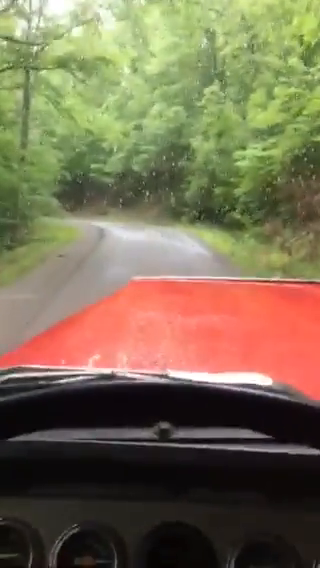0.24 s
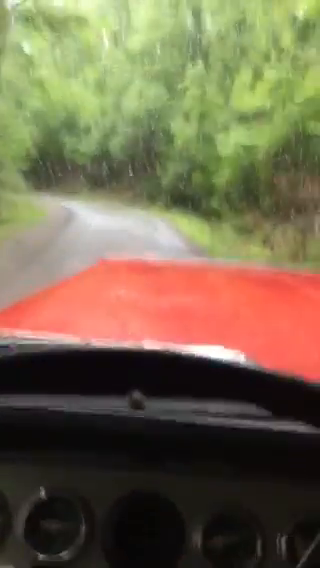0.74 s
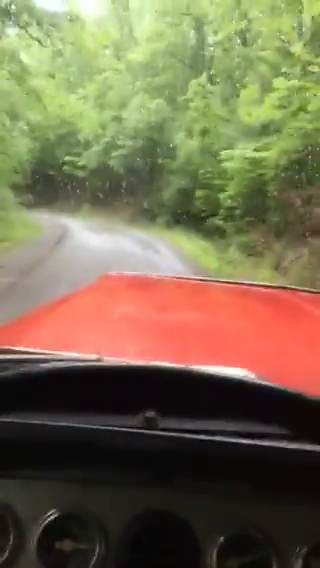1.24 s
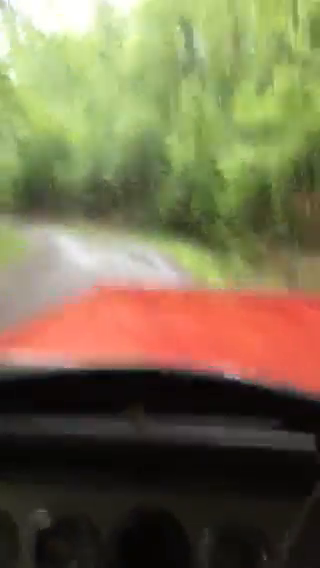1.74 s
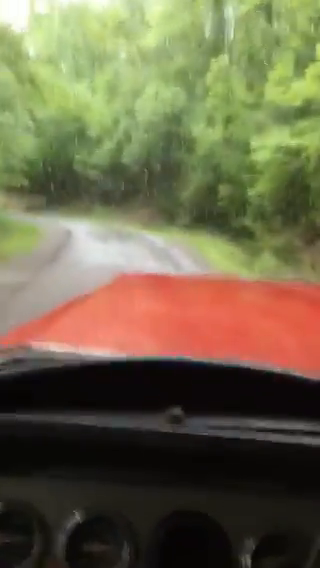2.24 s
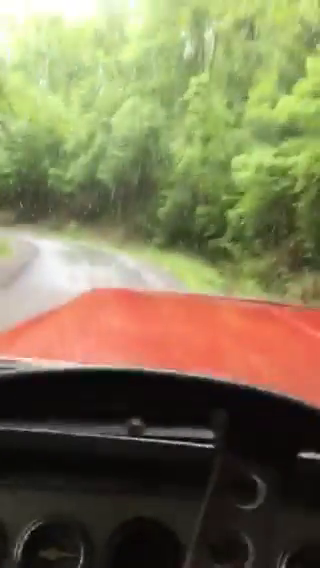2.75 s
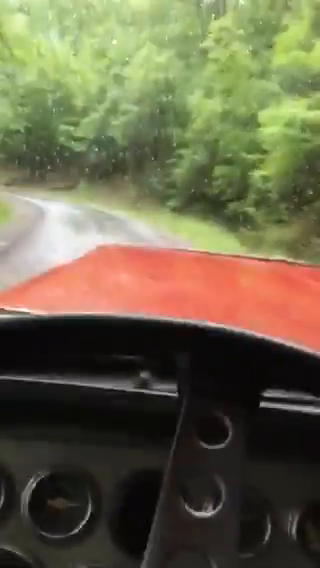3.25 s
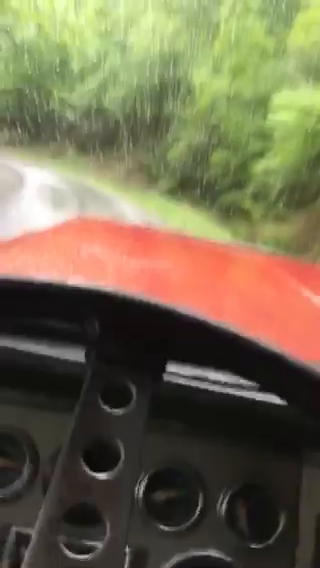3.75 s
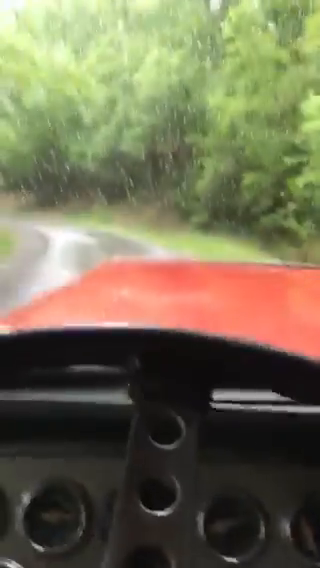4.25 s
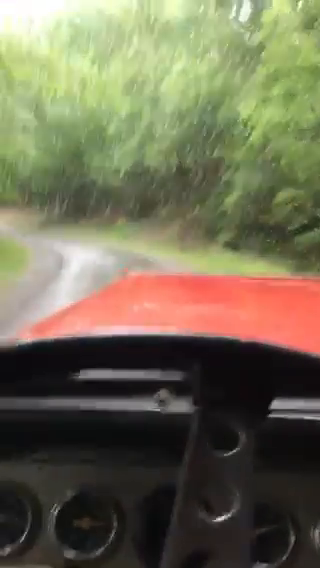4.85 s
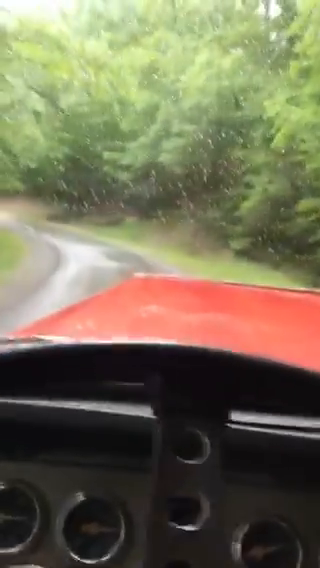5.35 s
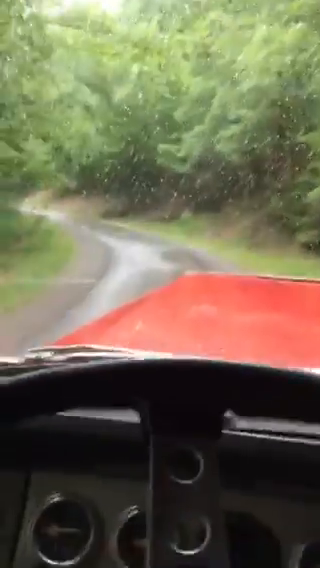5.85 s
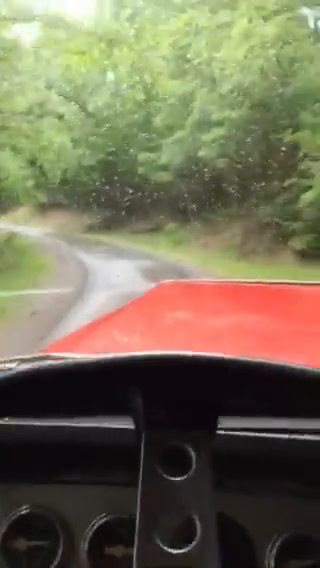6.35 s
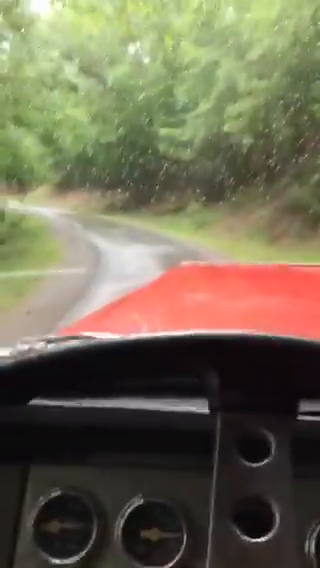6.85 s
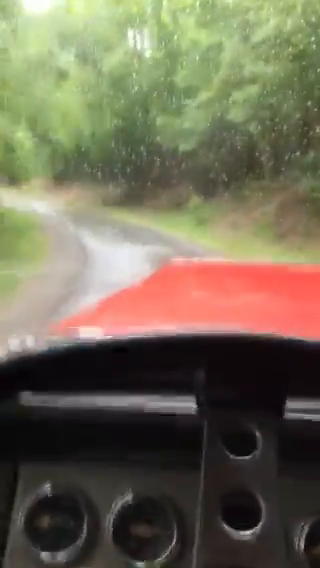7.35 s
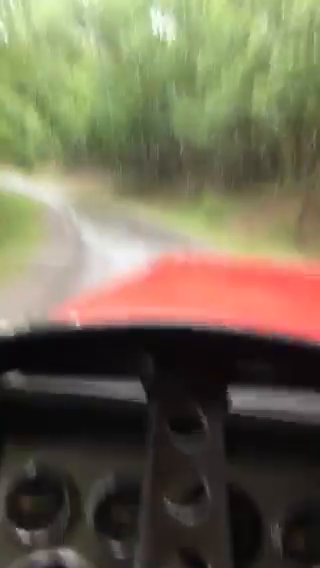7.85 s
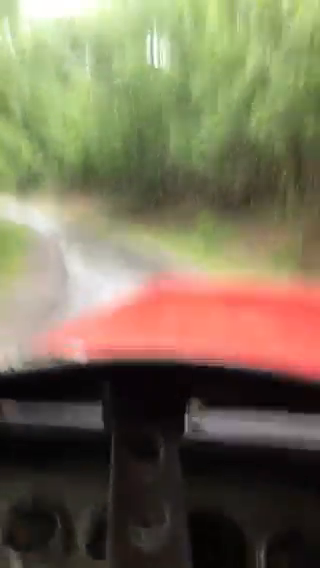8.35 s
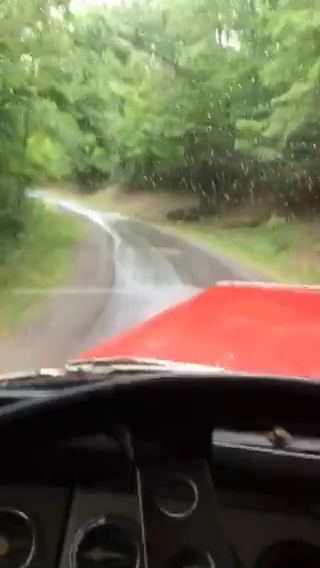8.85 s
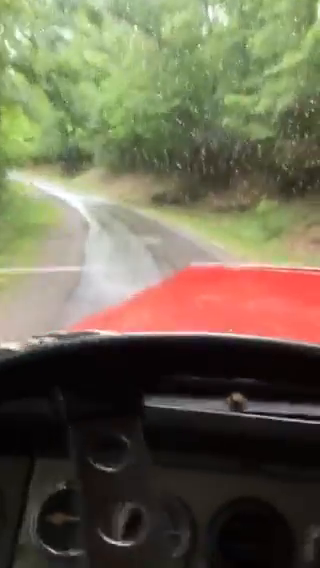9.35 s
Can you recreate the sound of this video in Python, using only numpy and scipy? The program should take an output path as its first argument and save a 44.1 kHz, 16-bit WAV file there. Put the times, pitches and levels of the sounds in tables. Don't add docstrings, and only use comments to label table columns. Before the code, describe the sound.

One close microphone in a small, closed cab catches a heavy, booming engine hum with a rough low rumble from the floor. Tonal gear whine and a very faint breathy turbo whistle ride above. A soft jolt opens it, followed by scattered metallic ticks, dash squeaks and short bracket rings. The middle is smoother, the engine sagging slightly, then pulling a little harder toward the end.

```python
import sys
import numpy as np
from scipy import signal
from scipy.fft import rfft, irfft
from scipy.io import wavfile
from scipy.ndimage import uniform_filter1d

SR = 44100
rng = np.random.default_rng(int(sys.argv[2]) if len(sys.argv) > 2 else 0)


def to_wav(sig):
    pcm = np.clip(np.atleast_2d(sig), -1, 1) * 32767
    pcm = np.round(pcm).astype(np.int16)
    wavfile.write(sys.argv[1], SR, pcm.T)


def natural_amplitude(level_db):
    exponent = np.asarray(level_db, float) / 20
    return 10 ** exponent


N = 423360
TIME = np.arange(N) / SR


def curves(table):
    s, *columns = np.transpose(table)
    return [np.interp(TIME, s, column) for column in columns]


def unit(x):
    return x / np.sqrt(np.mean(np.abs(x) ** 2))


def gain(db):
    return np.exp(db * np.log(10) / 20)


def walk(rate_hz):
    fine = 16
    count = int(N / SR * rate_hz) + 2
    held = np.repeat(rng.standard_normal(count), fine)
    slewed = uniform_filter1d(uniform_filter1d(held, size=fine), size=fine)
    return np.interp(TIME * rate_hz * fine, np.arange(len(slewed)), unit(slewed))


def humps(events):
    return sum(db * np.exp(-((TIME - s) / half_s) ** 2) for s, db, half_s in events)


def band(hz, width_hz):
    b, a = signal.iirpeak(hz, hz / width_hz, fs=SR)
    once = signal.lfilter(b, a, rng.standard_normal(N))
    return unit(signal.lfilter(b, a, once))


def line(turns, db, rough, rate):
    phase = (2 * np.pi * (turns - np.floor(turns) + rng.random())).astype(np.float32)
    in_phase = (1 + rough * walk(rate)) * np.cos(phase)
    quadrature = rough * walk(rate) * np.sin(phase)
    return np.sqrt(2) * gain(db) * (in_phase - quadrature)


def coloured(spectrum, level_db, flicker_db, rate):
    hz, db = np.transpose(spectrum)
    f = np.maximum(np.fft.rfftfreq(N, 1 / SR), 1)
    colour = natural_amplitude(np.interp(np.log(f), np.log(hz), db, -200, -200)) * np.sqrt(SR / 2)
    noise = rfft(rng.standard_normal(N)) * colour
    place = 2 * np.log2(f)
    total = 0
    for centre in np.arange(np.floor(2 * np.log2(hz[0])), 2 * np.log2(hz[-1]) + 1):
        part = irfft(noise * np.clip(1 - abs(place - centre), 0, 1), N)
        total = total + part * gain(flicker_db * walk(rate))
    return natural_amplitude(level_db - np.mean(level_db)) * total


def swell(hz, modes):
    lift_db = 4
    slow_hz, boost = hz[::256], curves(TURBO_SPEED)[0]
    gain_db = sum(db / (1 + (2 * (slow_hz - centre) / width) ** 2) for centre, width, db in modes)
    return np.interp(TIME, TIME[::256], gain_db) - lift_db * 10 * (1 - boost / boost.max())


# [multiple of the cycle, level/dB]
CYCLE_LINES = [(2, -49), (3, -39.5), (4, -38.5), (5, -42.5), (8, -50.5), (10, -43.5), (13, -52), (14, -52),
               (16, -61), (18, -53), (20, -64), (21, -69.5), (22, -56.5), (23, -65.5), (24, -63.5),
               (26, -68), (27, -62.5), (29, -61.5), (30, -60.5), (34, -59.5), (37, -62.5), (38, -64.5),
               (40, -64.5), (44, -62.5), (50, -66)]
SHAFT_RATIOS = (2, 14 / 3, 9.11, 9.516, 16)
SHAFT_DB = (-53, -59, -63.5, -60.5, -70.5)
# [f/Hz, width/Hz, gain/dB]
BULKHEAD = [(177.6, 2, 5), (179.6, 6, 12), (188.26, 3.5, 16.5), (422, 33, 9), (813, 8, 5), (836, 12, 10),
            (849, 9.3, 10.5), (1462, 30, 9.5)]


def engine(firings, firing_hz, boom_db):
    sway_db, timing_rise_db_per_s = 0.13, 1.5
    boom = line(firings, boom_db + sway_db * walk(5), rough=0.022, rate=33)
    uneven = sum(line(firings * k / 6, db, rough=0.082, rate=4) for k, db in CYCLE_LINES)
    levels = [db + swell(k * firing_hz, BULKHEAD) + walk(3) for k, db in zip(SHAFT_RATIOS, SHAFT_DB)]
    levels[-1] = levels[-1] + timing_rise_db_per_s * (TIME - TIME.mean())
    shafts = sum(line(firings * k, db, rough=0.03 * k, rate=20) for k, db in zip(SHAFT_RATIOS, levels))
    return boom + uneven + shafts


MESH_DB = (-56, -55.5, -59, -61.5)
# [multiple of the mesh, level/dB]
MESH_UPPER = [(5, -65.5), (7, -65.5), (9, -72)]
# [f/Hz, width/Hz, gain/dB]
HOUSING = [(220.5, 7, 9), (238, 4.1, 5), (249.2, 8, 16), (440, 12, 7.5), (481, 14, 5.5), (499.1, 22, 13.5),
           (669, 24, 10.5), (714, 19, 12), (747, 12, 12), (893, 31, 10), (955, 14, 7)]


def gear(hunting_hz, firing_hz):
    slip_ratio, lock_ratio = 2.416, 8 / 3
    grips_s, locks_s = 0.5, 3.6
    grip = np.clip((TIME - grips_s) / (locks_s - grips_s), 0, 1)
    ratio = slip_ratio + (lock_ratio - slip_ratio) * grip ** 2 * (3 - 2 * grip)
    mesh = np.cumsum(ratio * hunting_hz) / SR
    whine = 0
    for k, db in enumerate(MESH_DB, 1):
        level = db + swell(k * ratio * firing_hz, HOUSING) + 0.86 * walk(2.5)
        whine = whine + line(mesh * k, level, rough=0.08 * k, rate=22)
    slip_loss_db = 25 * (lock_ratio - ratio)
    for k, db in MESH_UPPER:
        whine = whine + line(mesh * k, db + 1.3 * walk(1.5) - slip_loss_db, rough=0.6, rate=35)
    return whine


# [t/s, shaft f/Hz]
TURBO_SPEED = [(0, 4490), (1.2, 4450), (2.4, 4420), (3.4, 4340), (4.2, 4370), (4.9, 4330), (6, 4420),
               (7.3, 4480), (7.8, 4420), (8.2, 4270), (8.7, 4030), (9, 4000), (9.6, 4080)]
# [multiple of the shaft, width/Hz, level/dB, loss/dB as the shaft slows by a tenth]
TURBO_PARTIALS = [(1, 200, -81, 3), (2, 380, -76, 7), (3, 600, -76.5, 2)]


def turbo():
    shaft_hz = curves(TURBO_SPEED)[0]
    turns = np.cumsum(shaft_hz) / SR
    slowing = 10 * (1 - shaft_hz / shaft_hz.max())
    flutter = natural_amplitude(1.3 * walk(20))
    air = 0
    for k, width_hz, db, loss_db in TURBO_PARTIALS:
        breath = walk(width_hz) + 1j * walk(width_hz)
        air = air + np.real(breath * np.exp(2j * np.pi * k * turns)) * natural_amplitude(db - loss_db * slowing)
    return flutter * air


def bursts(events, noise, rise_s, fall_s):
    t = np.arange(int(0.1 * SR)) / SR
    kicks = np.zeros(N)
    for s, db in events:
        kicks[int(s * SR)] = natural_amplitude(db)
    shape = (1 - np.exp(-t / rise_s)) * np.exp(-t / fall_s)
    return signal.fftconvolve(kicks, shape / shape.max())[:N] * noise


# [t/s, peak level/dB]
SQUEAKS = [(1.257, -54), (1.4717, -51.5), (1.9126, -58), (2.612, -55.5), (2.9622, -54), (3.2133, -55.5),
           (7.2537, -56), (7.3377, -54), (7.5146, -52)]
# [t/s, peak level/dB]
TICKS = [(0.446, -47.5), (0.8603, -53), (1.365, -53.5), (1.475, -47.5), (1.7582, -51.5), (1.93, -47),
         (2.6092, -58.5), (2.9706, -50.5), (3.1473, -55.5), (3.2126, -51.5), (7.7933, -51.5)]


def trim():
    squeak = unit(line(5700 * TIME, 0, rough=0.9, rate=1500))
    bright = unit(band(13500, 1500) + band(14000, 6000))
    squeaks = natural_amplitude(-6) * bursts(SQUEAKS, squeak, rise_s=0.003, fall_s=0.012)
    ticks = natural_amplitude(-8.5) * bursts(TICKS, bright, rise_s=0.0008, fall_s=0.013)
    return squeaks + ticks


def spells(table, hz, rough):
    gates = 0
    for s, length_s, db in table:
        inside_s = np.minimum(TIME - s, s + length_s - TIME)
        gates = gates + np.clip(inside_s / 0.0087, 0, 1) * natural_amplitude(db)
    return gates * line(hz * TIME, 0, rough, rate=40)


# [start t/s, length t/s, level/dB]
BRACKET_RINGS = [(.24, 0.13, -53), (0.464, 0.071, -50), (0.559, 0.065, -54), (.63, 0.056, -50),
                 (.7, .05, -55), (1.069, 0.28, -49.5), (1.331, .07, -50), (1.64, .07, -50),
                 (1.751, .1, -53)]


def bracket():
    return spells(BRACKET_RINGS, 1462, rough=0.1)


# [start t/s, length t/s, level/dB]
DRAUGHTS = [(3.9, 0.48, -72.5), (4.5, 0.56, -73.5), (5.1, .55, -72)]


def door_seal():
    return spells(DRAUGHTS, 3250, rough=0.6)


# [t/s, effort level/dB]
LOAD = [(0, 0.5), (.5, 0), (1.6, .5), (2.4, -2), (3.2, -1), (3.6, -1), (4.8, -1.5), (5.6, -0.5), (7, 0),
        (7.6, 2), (8, .5), (8.4, 1.1), (9.6, -0.5)]


def effort_db():
    return curves(LOAD)[0]


# [f/Hz, level/dB per Hz]
JOIN = (400, -80)
# [f/Hz, level/dB per Hz]
BLOCK = [JOIN, (450, -76), (520, -73.0), (620, -78.0), (680, -74), (800, -74.0), (950, -75.5),
         (1100, -80.5), (1400, -79.0), (1700, -81.5), (2000, -82.5), (2600, -86.5), (2900, -92.5),
         (3300, -95.5)]
# [f/Hz, width/Hz, level/dB]
PANELS = [(489.4, 21, -56.5), (820, 110, -68.5), (970.4, 46, -59), (1305, 50, -61.5), (1459, 59, -59.5),
          (1699, 68, -62), (2045, 66, -65.5), (2498, 70, -72), (3260, 120, -72)]


def block():
    load_db = effort_db()
    panels = sum(band(hz, width) * natural_amplitude(db + walk(2.8)) for hz, width, db in PANELS)
    clatter = coloured(BLOCK, load_db, flicker_db=0.5, rate=12)
    return clatter + panels * natural_amplitude(load_db - np.mean(load_db))


# [f/Hz, level/dB per Hz]
ROAD = [(22, -81.5), (28, -63.5), (34, -61.0), (50, -56.5), (75, -57.0), (110, -54.0), (140, -57.0),
        (168, -60), (195, -61), (230, -68), (260, -73.0), (300, -76.0), (350, -80.0), JOIN]


def road():
    bump_db, bump_s = 8, 0.15
    level_db = 0.4 * effort_db() + bump_db * np.exp(-TIME / bump_s)
    return coloured(ROAD, level_db, flicker_db=1.3, rate=18)


# [f/Hz, level/dB per Hz]
SPRAY = [(2900, -94.5), (3500, -92.5), (4000, -97.5), (4550, -99), (4850, -105), (5600, -102), (6700, -104),
         (7700, -108.5), (8800, -107.5), (9800, -108.5), (10400, -112), (11300, -109.5), (13500, -109),
         (15800, -110.5)]
# [t/s, extra level/dB, half-length t/s]
PUDDLES = [
    (.5, 2, .25),
    (3.15, 2, .1),
]


def spray():
    return coloured(SPRAY, effort_db() + humps(PUDDLES), flicker_db=0.6, rate=22)


# [t/s, firing f/Hz]
FIRING = [(0, 91.6), (.4, 91.9), (1.2, 91.5), (1.5, 90.8), (2.7, 90.55), (3.5, 89.3), (3.8, 89.55),
          (4.2, 88.8), (4.5, 89.3), (5.4, 89.45), (5.9, 90.45), (6.25, 90.6), (7.0, 92.2), (7.5, 93.7),
          (8.4, 93.7), (8.7, 92.6), (9.05, 93.45), (9.6, 92.9)]
# [t/s, level/dB, half-length t/s]
ROCKING = [(.12, 1.5, .06), (.4, -1, .08), (.66, 1.5, .13), (1.7, 1.2, .2), (2.17, 1.8, .2),
           (3.05, -0.5, .12), (3.32, 2, .07), (3.8, .5, .2), (4.33, 1.5, .13), (4.85, 1, .12),
           (5.3, -0.1, .15), (6.0, 1.2, .15), (6.45, 0.3, .2), (7.46, -1.4, .09), (7.75, 0.8, .12),
           (8.05, 0.8, .08), (8.35, -.7, .15), (8.75, 1.3, .15), (9.15, 0.2, .2)]


def scene():
    firing_hz = curves(FIRING)[0]
    boom_db = -16 + humps(ROCKING)
    hunting_hz = firing_hz + 0.25 * walk(8)
    firings = np.cumsum(hunting_hz) / SR
    machinery = engine(firings, firing_hz, boom_db) + gear(hunting_hz, firing_hz) + turbo()
    loose_parts = trim() + bracket() + door_seal()
    background = block() + road() + spray()
    return (machinery + loose_parts + background)[None]


def roll_off(x):
    return signal.sosfilt(signal.butter(12, 15710, fs=SR, output="sos"), x)


def record(dry):
    edge = np.clip(np.minimum(TIME, TIME[-1] - TIME) / 0.004, 0, 1)
    mix = dry * np.sin(np.pi / 2 * edge) ** 2
    return roll_off(mix)


dry = scene()
out = record(dry)
to_wav(out)
```